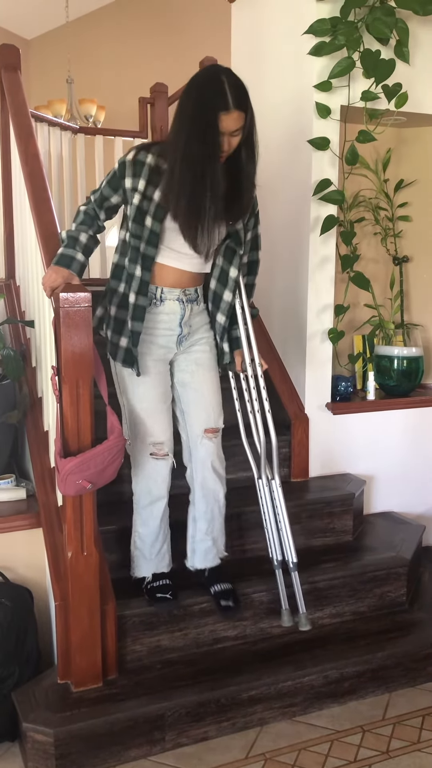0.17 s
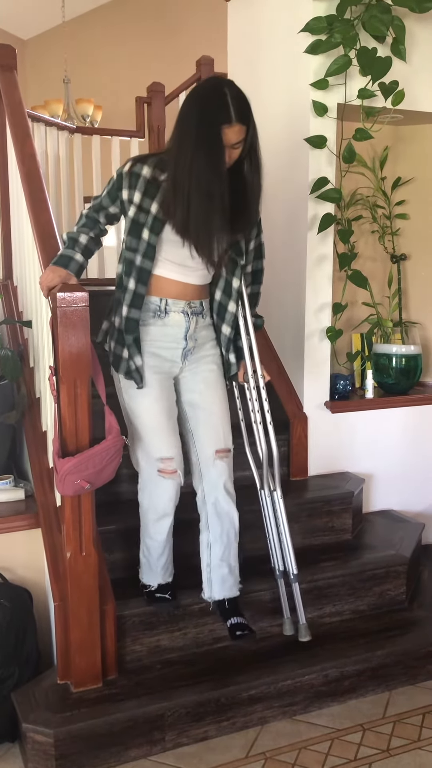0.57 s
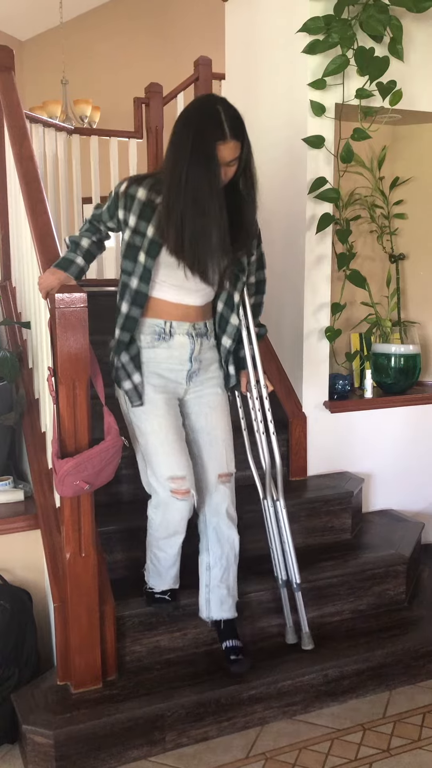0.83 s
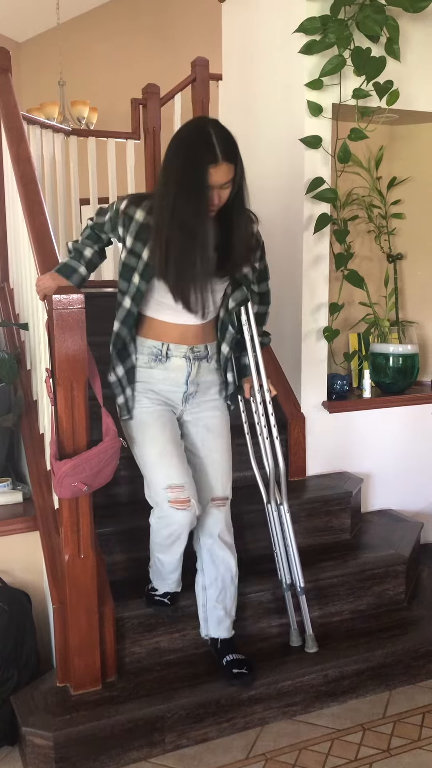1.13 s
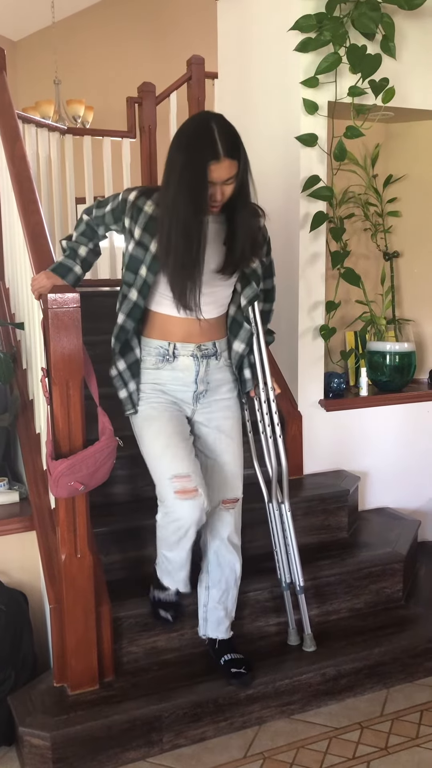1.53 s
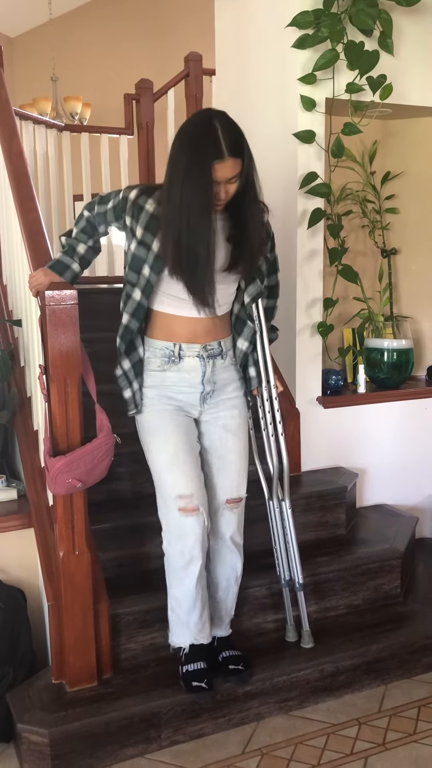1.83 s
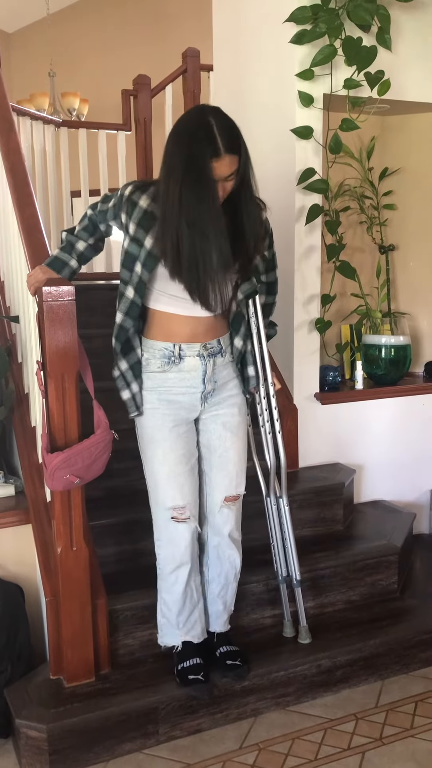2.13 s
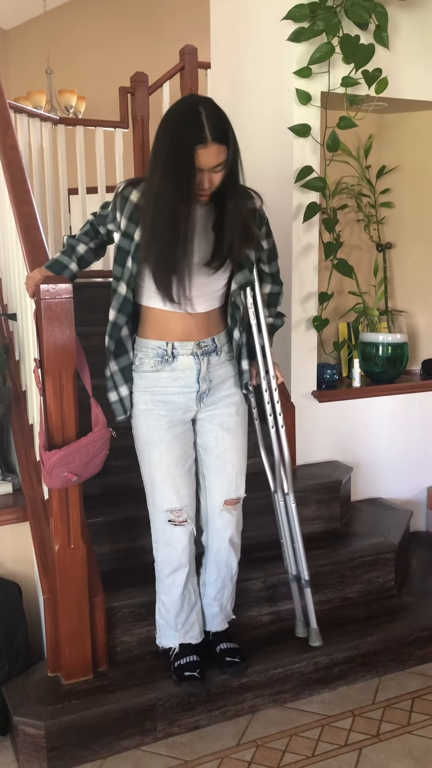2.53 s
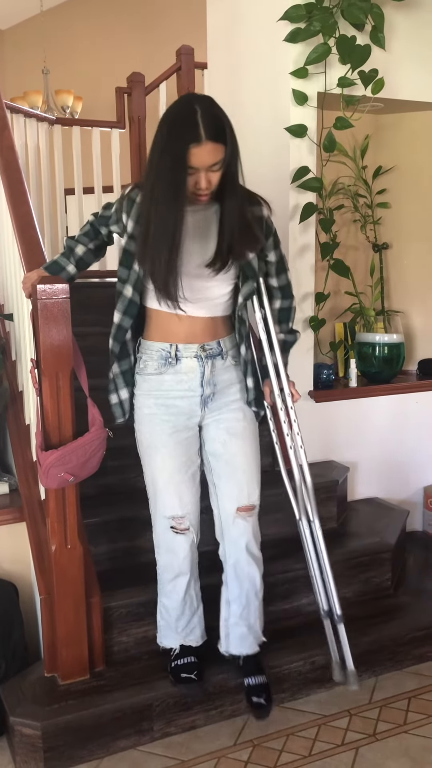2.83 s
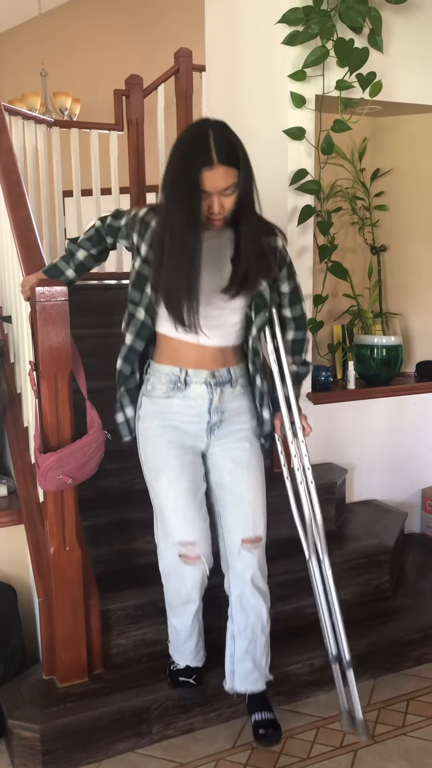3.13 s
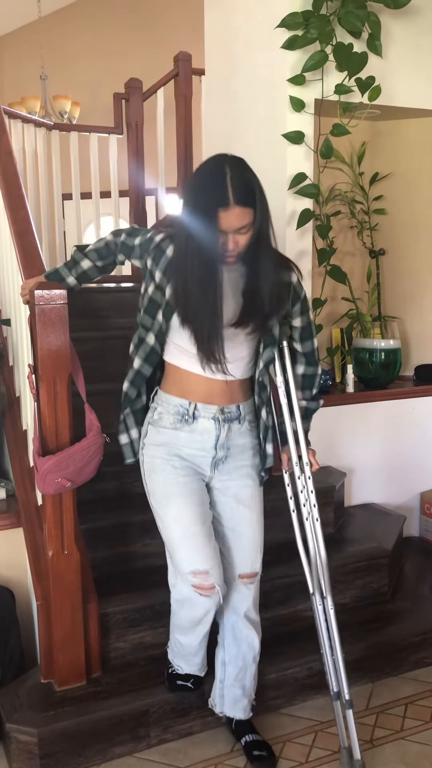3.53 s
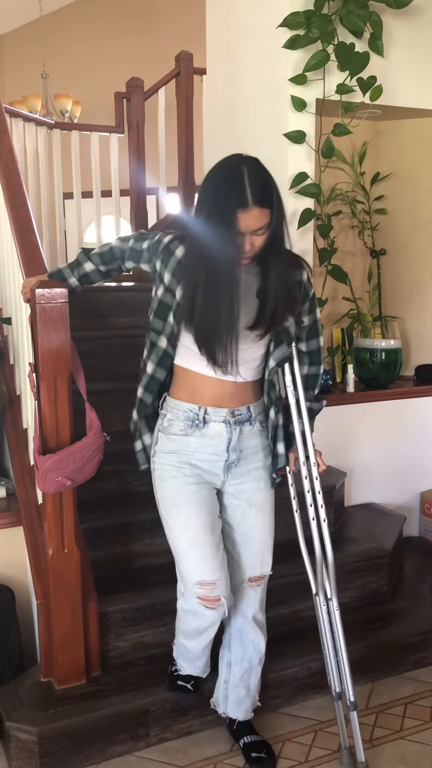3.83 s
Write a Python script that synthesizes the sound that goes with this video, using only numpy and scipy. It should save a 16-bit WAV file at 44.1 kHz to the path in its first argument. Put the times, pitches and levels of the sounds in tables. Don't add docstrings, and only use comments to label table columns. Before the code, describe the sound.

Metal crutches descend wooden stairs in a lively hall. Soft thuds and cloth swishes begin, with a deeper thud near 0.7 s and a bright clattering clack at 0.9 s. Quiet steps and swishes follow; loose bolts tick and rattle around 2.2-3.3 s. The loudest, sharpest clack hits tile at 3.46 s, rebounding at 3.6 s. A very faint rubber drag ends it near 3.9 s, over low hum and hiss.

```python
import sys
import numpy as np
from scipy import signal
from scipy.fft import rfft, irfft, next_fast_len
from scipy.io import wavfile
from scipy.ndimage import uniform_filter1d, map_coordinates

SR = 44100
rng = np.random.default_rng(int(sys.argv[2]) if len(sys.argv) > 2 else 0)


def bounce(signal):
    frames = np.transpose(np.atleast_2d(signal))
    limited = np.clip(frames, -1, 1)
    pcm = np.round(limited * 32767).astype(np.int16)
    wavfile.write(sys.argv[1], SR, pcm)


def amplitude_ratio(level_db):
    exponent = np.asarray(level_db, float) / 20
    return 10 ** exponent


N = 176400
T = np.arange(SR // 2) / SR

HALL_DB, THUD_HALL_DB, CLOTH_HALL_DB = -4, -3, -4
TICK_RISE_S = 0.0012


def unit(x):
    return x / np.sqrt(np.mean(x ** 2) + 1e-20)


def along(points, hz):
    point_hz, value = np.transpose(points)
    return np.interp(np.log(hz + 1), np.log(point_hz + 1), value)


def wobble(rate_hz):
    knots = rng.standard_normal(int(N * 40 / SR) + 4)
    return map_coordinates(knots, [np.arange(N) * min(rate_hz, 39) / SR])


def filtered(x, response):
    size = next_fast_len(len(x) + 4096)
    spectrum = rfft(x, size) * response(np.fft.rfftfreq(size, 1 / SR))
    return irfft(spectrum, size)[:len(x)]


def peak(f, hz, width_hz):
    return 1j * f * width_hz / (hz * hz - f * f + 1j * f * width_hz)


def tilt(f, db_per_octave):
    return amplitude_ratio(db_per_octave * np.log2((f + 200) / 4000))


def add(x, start_s, piece):
    part = x[round(start_s * SR):][:len(piece)]
    part += piece[:len(part)]


def rush(spectrum, patchy_db):
    z = signal.stft(rng.standard_normal(N), nperseg=512)[2]
    patches = uniform_filter1d(rng.standard_normal(z.shape), 6, 0)
    patches = unit(uniform_filter1d(patches, 12, 1))
    noise = signal.istft(z * amplitude_ratio(patchy_db * patches), nperseg=512)[1][:N]
    return unit(filtered(noise, lambda f: amplitude_ratio(along(spectrum, f))))


def hall(x):
    # frequency in Hz, t60 in s.
    decay = [(60, 0.26), (300, 0.71), (1200, 0.81), (4000, 0.68), (8000, 0.41), (15000, 0.28)]
    gap_s = 0.0026
    hz, t, z = signal.stft(rng.standard_normal(SR), SR, nperseg=256)
    fade = amplitude_ratio(-60 * t / along(decay, hz)[:, None])
    tail = signal.istft(z * fade, SR, nperseg=256)[1]
    tail = tail * (1 - np.exp(-np.arange(len(tail)) / SR / gap_s))
    return signal.fftconvolve(x, tail / np.linalg.norm(tail))[:len(x)]


def room_tone():
    # frequency in Hz, level in dB per Hz.
    air = [(15, -50), (32, 1.5), (55, -1), (85, -8), (140, -6.5), (210, -2.5), (400, -11), (560, -10.5),
           (1000, -27.5), (2200, -42)]
    # frequency in Hz, level in dB per Hz.
    hiss = [(300, -13), (700, -5.5), (1500, -10.5), (3000, -15), (7000, -19.5), (12000, -25.5),
            (16000, -19.5)]
    # frequency in Hz, level in dB rms.
    partials = [(59.2, -63.5), (199.2, -76), (355.3, -76), (414.5, -72), (530, -77)]
    air_db, hiss_db = -60, -69
    t = np.arange(N) / SR
    out = amplitude_ratio(air_db) * rush(air, patchy_db=0.5)
    out += amplitude_ratio(hiss_db + 0.11 * wobble(5.5)) * rush(hiss, patchy_db=2.0)
    for hz, db in partials:
        level = amplitude_ratio(db + 3.0 + 0.16 * wobble(4.54))
        out += level * np.sin(2 * np.pi * hz * t + 0.15 * wobble(4.6))
    return out


def swishes():
    # start in s, rise in s, fall in s, level in dB, brightness in dB per octave.
    strokes = [(.1, 0.032, 0.14, -60, -3.5), (.44, 0.037, 0.19, -61, -1.5), (.645, 0.023, 0.19, -64.5, 1),
               (.73, 0.059, 0.2, -63, -0.5), (1.0, .08, 0.19, -71, -0.5), (1.35, 0.068, 0.21, -70, -2.5),
               (1.487, 0.046, 0.12, -56, -2.5), (1.6, 0.057, 0.15, -75.5, 3), (1.899, 0.022, 0.11, -63, -6),
               (2.16, 0.039, 0.057, -65.5, -5.5), (2.22, 0.045, 0.078, -60, -2),
               (2.5, 0.086, 0.21, -64, -4), (2.7, 0.038, 0.22, -62, -4), (2.92, 0.044, 0.079, -84.5, 8.5),
               (3.385, 0.018, 0.031, -62.5, -1), (3.85, 0.065, 0.15, -84, -10)]
    # frequency in Hz, level in dB per Hz.
    friction = [(300, -13), (800, -5), (2500, -7), (6000, -1), (11000, -2), (16000, 1)]
    out = np.zeros(N)
    cloth = rush(friction, patchy_db=0.8) * amplitude_ratio(1.5 * wobble(35.47))
    for start_s, rise_s, fall_s, db, bright_db in strokes:
        ramp = np.interp(T, [0, rise_s, rise_s + fall_s], [0, 1, 0])
        shape = np.sin(np.pi / 2 * ramp) ** 2
        piece = cloth[round(start_s * SR):][:len(T)]
        stroke = filtered(piece * shape[:len(piece)], lambda f: tilt(f, bright_db))
        add(out, start_s, amplitude_ratio(db) * stroke)
    return out


def thuds():
    # start in s, peak in dB, pitch in Hz, t60 in s.
    steps = [(.12, -60, 296, 0.1), (.18, -58, 231, 0.076), (.21, -55.5, 380, 0.066),
             (1.615, -53, 421.6, 0.18), (1.7, -64, 201, 0.088), (.305, -48.5, 513, 0.054),
             (.313, -49, 376, 0.038), (.335, -56.5, 404, 0.15), (.36, -62, 507, 0.11),
             (.647, -43, 81, 0.14), (0.665, -34, 129, 0.046), (.686, -39, 77.2, 0.1),
             (0.706, -39.5, 92.6, 0.14), (0.714, -40, 88, 0.14), (.748, -47.5, 96, .15),
             (.766, -44, 150, 0.12), (0.893, -45, 238, 0.06), (.893, -44, 526, 0.12),
             (3.497, -46, 525.7, 0.25), (0.918, -46.5, 132, 0.19), (1.158, -41.5, 46.5, 0.24),
             (1.598, -53.5, 220, 0.15), (1.598, -56, 352, 0.086), (1.6, -56.5, 506, 0.24),
             (1.629, -58, 188, 0.11), (1.666, -57.5, 239, 0.14), (1.657, -48.5, 94.4, 0.12),
             (1.814, -46, 143, 0.082), (1.855, -46.5, 154, 0.15), (1.883, -56, 134, 0.13),
             (3.2, -53.5, 150, 0.14), (3.25, -53, 121, 0.069), (3.659, -51.5, 93, 0.091),
             (3.178, -43.5, 46.3, 0.21), (3.389, -38, 220, 0.14), (3.441, -42.5, 175.4, .14),
             (3.401, -50, 120, .15), (3.388, -37.5, 458, 0.06), (3.42, -44, 181, 0.12),
             (3.384, -43, 85, 0.091), (3.423, -39, 60, 0.12), (3.46, -39.5, 87, 0.12),
             (3.456, -38, 229, 0.13), (3.758, -48, 42, 0.17), (3.853, -48, 192.3, 0.085),
             (3.881, -54, 123, 0.058)]
    rise_cycles, noise_db = 0.22, -9
    out = np.zeros(N)
    for start_s, db, hz, t60_s in steps:
        noise = rng.standard_normal(len(T))
        neighbours = unit(filtered(noise, lambda f: peak(f, 1.054 * hz, 1.54 * hz) ** 2))
        shape = amplitude_ratio(db - 60 * T / t60_s) * (1 - np.exp(-T * hz / rise_cycles))
        mode = 1.124 * np.sin(2 * np.pi * hz * T)
        add(out, start_s, shape * (mode + amplitude_ratio(noise_db) * neighbours))
    return out


def ticks():
    # start in s, peak in dB, pitch in Hz, sharpness Q.
    shifts = [(0.303, -54, 1380, 0.63), (0.545, -49.5, 3000, 0.57), (0.557, -52.5, 1500, 1.4),
              (0.636, -50.5, 4300, 0.67), (1.596, -49.5, 910, 0.55), (2.279, -54, 1590, 1.7),
              (2.344, -41.5, 4470, 0.38), (2.347, -55, 1960, 2), (2.357, -43, 1300, 0.74),
              (2.371, -50, 2600, 0.54), (2.56, -58, 3120, 2), (2.723, -56, 1290, 2.5),
              (2.737, -53, 2500, 0.76), (2.79, -49.5, 1350, 2.7), (3.122, -54, 2160, 1.7),
              (3.132, -50, 714, 2), (3.151, -61.5, 4000, 1.5), (3.228, -50.5, 2980, 0.7),
              (3.385, -52.5, 3500, 0.39), (3.388, -43, 910, 1.2), (3.99, -72, 6500, 2)]
    base_t60_s, t60_s_per_q, q_scale = 0.025, 0.0069, 1.5
    out = np.zeros(N)
    for start_s, db, hz, q in shifts:
        def colour(f):
            return peak(f, hz, q_scale * hz / q) ** 2 / (1 + (f / hz / 2) ** 2)

        click = unit(filtered(rng.standard_normal(len(T)), colour))
        decay = amplitude_ratio(-60 * T / (base_t60_s + t60_s_per_q * q))
        add(out, start_s, 0.74 * amplitude_ratio(db) * (1 - np.exp(-T / TICK_RISE_S)) * decay * click)
    return out


def ring():
    # frequency in Hz, level in dB, t60 in s.
    modes = [(1786, -40, 0.14), (2734, -42, 0.076), (2887, -30, 0.15), (3840, -33.5, 0.14),
             (3996, -31.5, 0.16), (4900, -37, 0.08), (5720, -48, 0.07)]
    out = np.zeros(len(T))
    for hz, db, t60_s in modes:
        level = amplitude_ratio(db + rng.normal(0, 2) - 60 * T / t60_s)
        out += level * np.sin(2 * np.pi * hz * rng.normal(1, 0.0034) * T)
    return out


def clacks():
    # start in s, peak in dB, brightness in dB per octave, chatter t60 in s, rise in s.
    strikes = [(0.8825, -28.5, 1.5, 0.076, 0.0014), (0.8917, -25, -1, 0.019, 0.00029),
               (0.8936, -23, 1, 0.024, 0.00031), (0.8988, -33, -5.5, 0.031, 0.00051),
               (.907, -34.5, -7.5, 0.14, 0.0091), (.9245, -37.5, -4, 0.023, .001),
               (.93, -29.5, -1, 0.048, 0.0025), (0.975, -39.5, -5, 0.058, 0.0019),
               (0.988, -35, 4, 0.015, 0.00044), (3.4615, -15, 0.5, 0.026, 0.00025),
               (3.4657, -19.5, 0.5, 0.023, 0.00048), (3.476, -32, -1, 0.056, 0.00081),
               (3.4825, -27, 11, 0.023, .0008), (3.6061, -35.5, -2, 0.05, 0.0014),
               (3.6083, -28, -1.5, 0.013, 0.0004), (3.623, -25, 0.5, 0.019, 0.00045),
               (3.6247, -32.5, -3, 0.011, .0003), (3.628, -38, -5.5, 0.045, 0.00052)]
    # frequency in Hz, dB per Hz on wooden tread, on tile, on rebound.
    chatter = [(150, -35, -29, -35), (600, -3.5, -2.5, -3), (1500, -3.5, -2, -8.5), (2500, -4, -4, -3.5),
               (4000, -5.5, -4.5, -5), (8000, -4.5, -5.5, -6), (11900, -8, -5, -7),
               (16200, -7.5, -5.5, -7.5)]
    # frequency in Hz, width in Hz, dB on wooden tread, on tile, on rebound.
    tube = [(1780, 170, 14, -7, 13), (2097, 110, 15, -15, 10), (3050, 560, 9, 6, 8), (4000, 270, 1, 7, 7),
            (5050, 170, 9, 0, -9), (5670, 420, 11.5, 4, 14.5), (6500, 390, 4, -11, 4),
            (7920, 300, 7, 5, -1), (8700, 720, 6, 8.5, 10.5), (11430, 290, 6, 4, -2), (14300, 700, 1, 6, 0),
            (15200, 410, 2, -5, 3)]
    on_tile_s, rebound_s = 3, 3.55
    tube_db, spiky_db = -2, 1.5
    out = np.zeros(N)
    for start_s, db, bright_db, t60_s, rise_s in strikes:
        ground = int(start_s > on_tile_s) + int(start_s > rebound_s)
        spectrum = [(row[0], row[1 + ground]) for row in chatter]

        def body(f):
            resonance = sum(amplitude_ratio(g[ground]) * peak(f, hz, width_hz) for hz, width_hz, *g in tube)
            colour = tilt(f, bright_db) * amplitude_ratio(along(spectrum, f))
            return colour * (1 + amplitude_ratio(tube_db) * abs(resonance))

        noise = rng.standard_normal(len(T)) * amplitude_ratio(spiky_db * rng.standard_normal(len(T)))
        onset = amplitude_ratio(db) * (1 - np.exp(-T / rise_s))
        crack = 0.51 * onset * unit(filtered(noise, body)) * amplitude_ratio(-60 * T / t60_s)
        modes = onset * ring()
        blow = filtered(signal.unit_impulse(len(T), idx=100), body)
        heard = modes + blow * np.linalg.norm(crack) / np.linalg.norm(blow)
        add(out, start_s, crack + modes)
        add(out, start_s, amplitude_ratio(HALL_DB) * hall(np.pad(heard, (0, SR))))
    return out


def rattles():
    # start in s, level in dB of the low, middle and high mode.
    knocks = [(2.226, -60, -68, -67), (2.279, -56.5, -56, -60), (2.296, -66, -67, -74),
              (2.318, -57, -61, -56), (2.345, -62, -72, -54), (2.357, -56.5, -70, -50.5),
              (2.376, -56, -67, -56), (2.41, -59, -63, -65), (2.44, -69, -71, -66), (2.732, -60, -56, -56),
              (2.835, -56, -59, -57), (2.846, -59, -76, -66), (3.228, -50.5, -70, -64),
              (3.255, -66, -59.5, -74), (3.289, -66, -73, -64)]
    # frequency in Hz, width in Hz, t60 in s.
    bolt_modes = [(2860, 350, .032), (4930, 200, .045), (5600, 450, .028)]
    out = np.zeros(N)
    for start_s, *levels_db in knocks:
        for db, (hz, width_hz, t60_s) in zip(levels_db, bolt_modes):
            noise = rng.standard_normal(len(T))
            grit = unit(filtered(noise, lambda f: peak(f, hz, width_hz) ** 2))
            tone = np.sin(2 * np.pi * hz * rng.normal(1, 0.013) * T)
            shape = amplitude_ratio(db - 60 * T / t60_s) * (1 - np.exp(-T / TICK_RISE_S))
            add(out, start_s, shape * (0.65 * tone + 0.59 * grit))
    return out


def drag():
    # time in s, pitch in Hz, level in dB.
    slide = [
        (3.839, 4100, -95),
        (3.875, 4400, -79),
        (3.905, 4900, -72),
        (3.945, 4250, -79),
        (4.0, 4060, -75),
    ]
    width_hz = 280
    time_s, hz, db = np.transpose(slide)
    t = np.arange(N) / SR
    grit = unit(filtered(rng.standard_normal(N), lambda f: 1 / (1 + (f / width_hz) ** 2)))
    phase = 2 * np.pi * np.cumsum(np.interp(t, time_s, hz)) / SR
    return amplitude_ratio(np.interp(t, time_s, db, left=-200)) * grit * np.sin(phase)


def scene():
    room, cloth, thud = room_tone(), swishes(), thuds()
    metal = ticks() + rattles() + drag()
    wet = amplitude_ratio(HALL_DB) * metal + amplitude_ratio(THUD_HALL_DB) * thud + amplitude_ratio(CLOTH_HALL_DB) * cloth
    mix = clacks() + metal + thud + cloth + hall(wet) + room
    return mix[None]


def top_cut(x):
    return signal.sosfilt(signal.butter(12, 16930, fs=SR, output="sos"), x)


def record(dry):
    mic_low_hz, top_hz, above_top_db = 29.7, 15890, -36
    edge = [(top_hz - 150, 0), (top_hz + 50, above_top_db)]

    def microphone(f):
        return amplitude_ratio(along(edge, f)) * (1j * f / (mic_low_hz + 1j * f)) ** 3

    return top_cut(filtered(dry[0], microphone)[None])


dry = scene()
out = record(dry)
bounce(out)
```